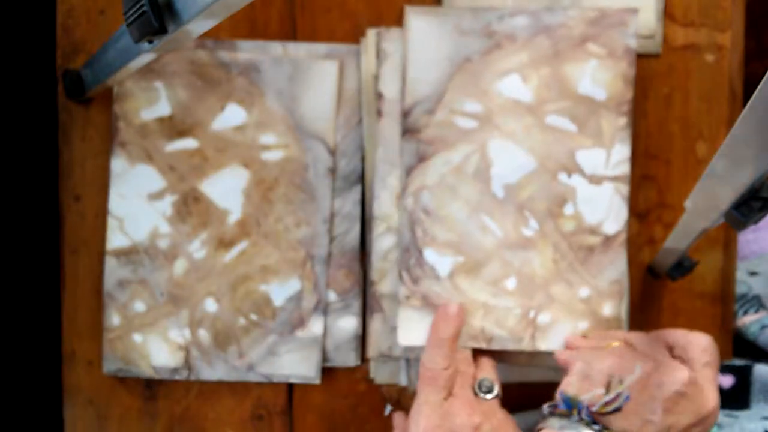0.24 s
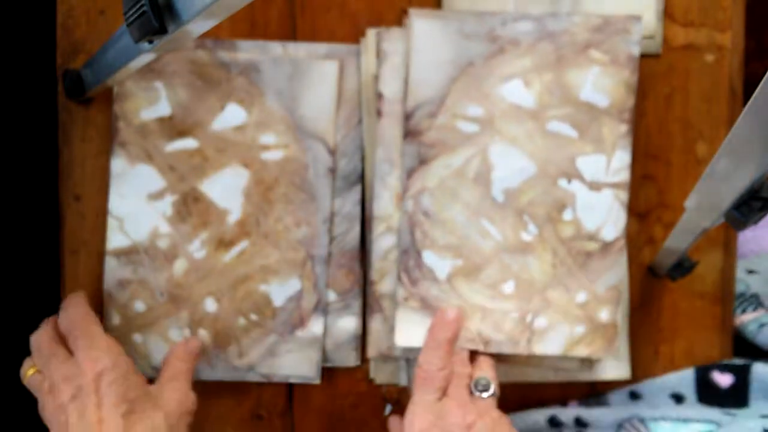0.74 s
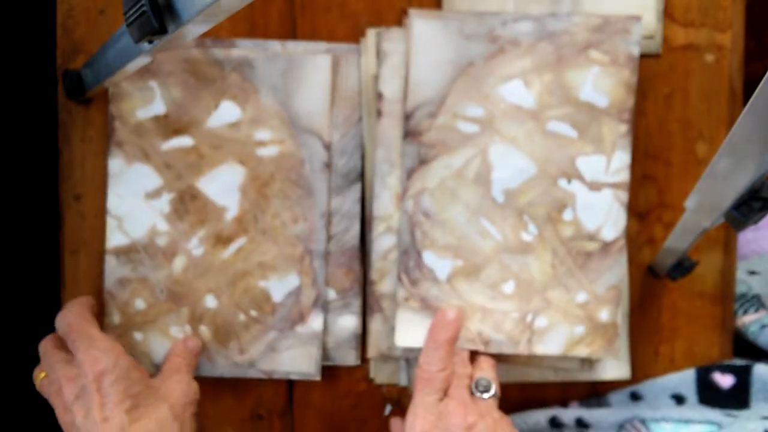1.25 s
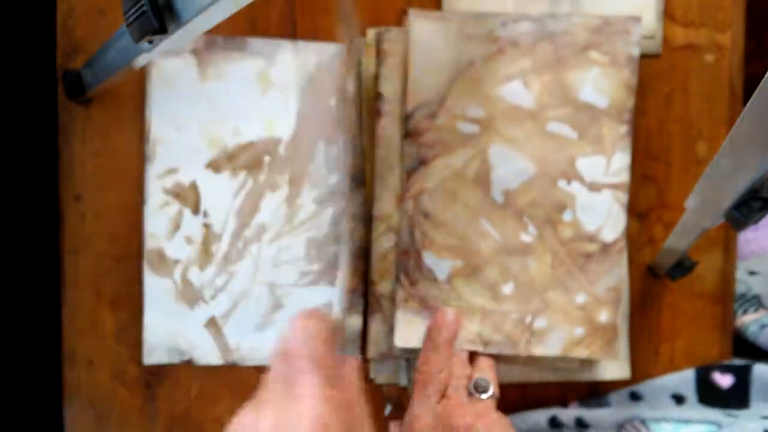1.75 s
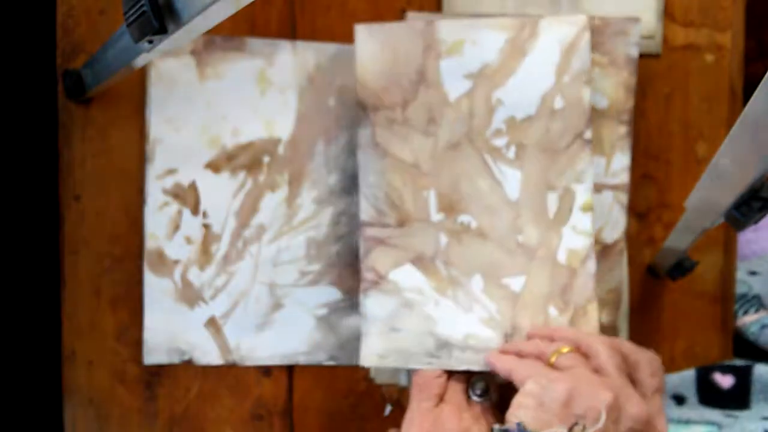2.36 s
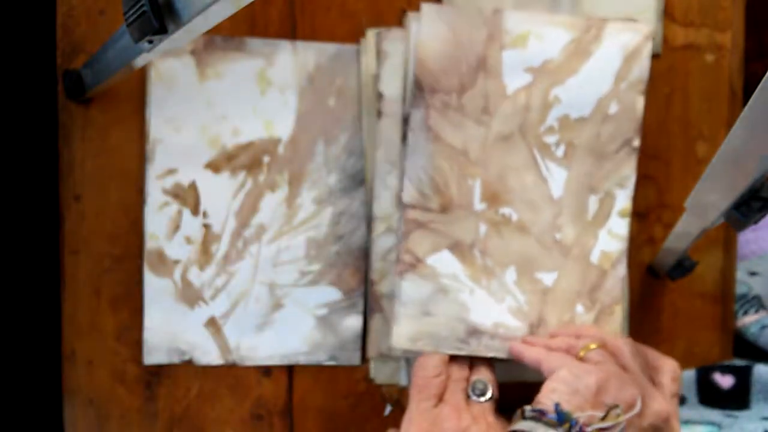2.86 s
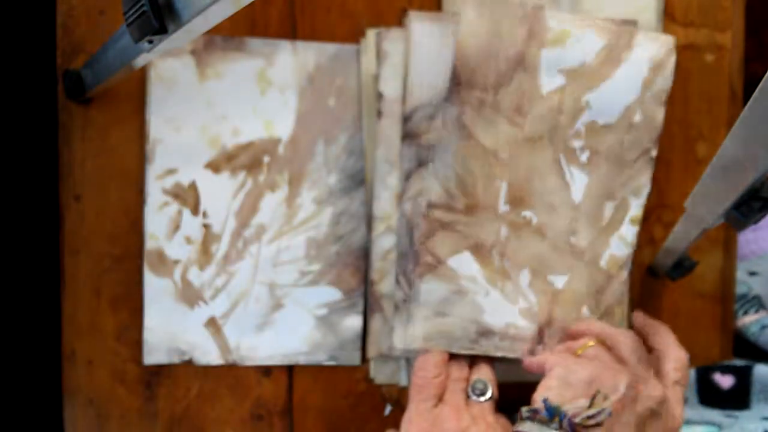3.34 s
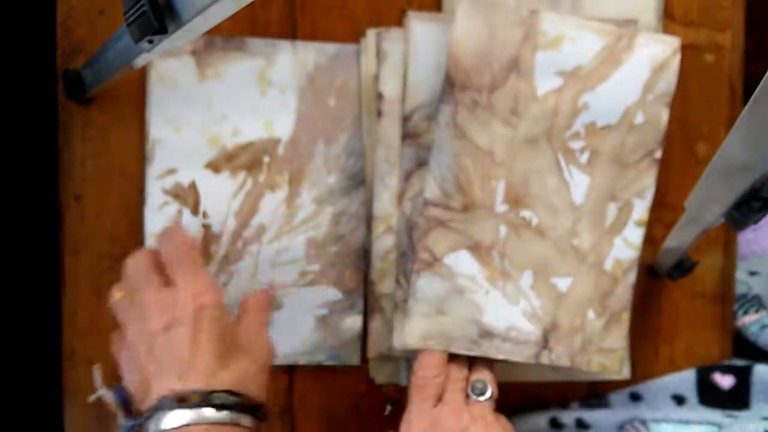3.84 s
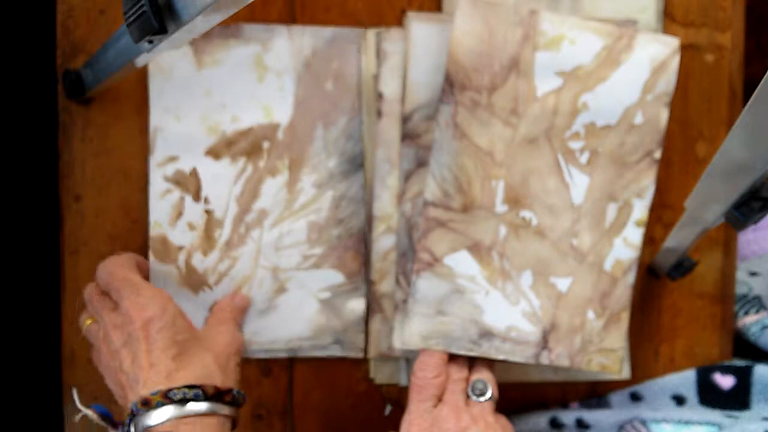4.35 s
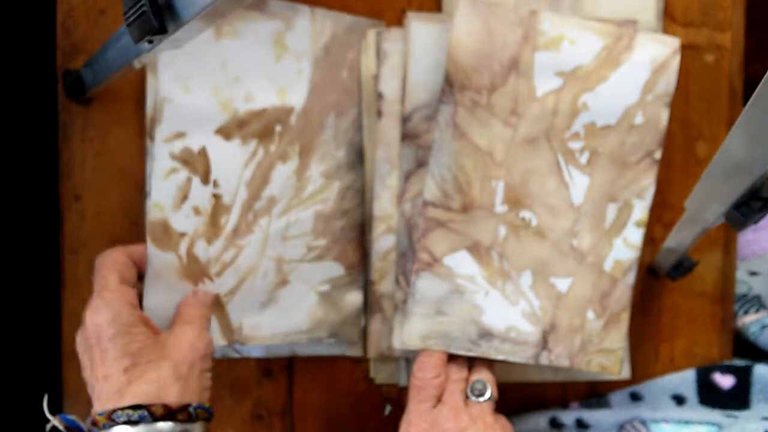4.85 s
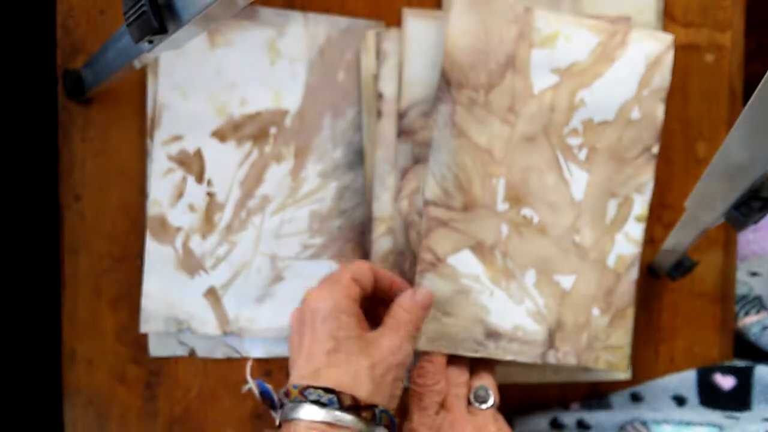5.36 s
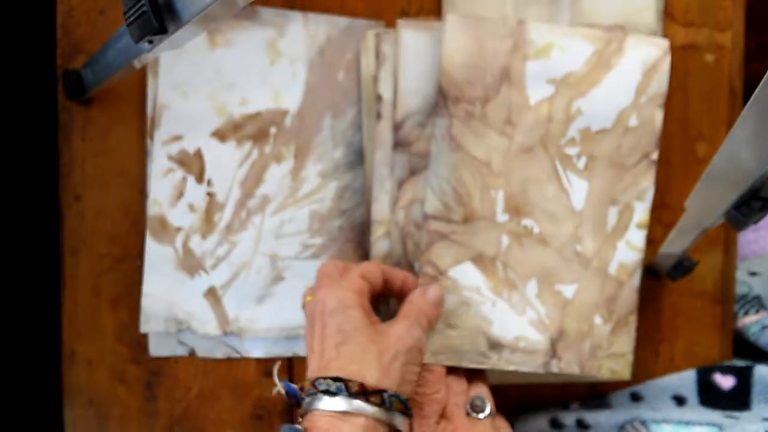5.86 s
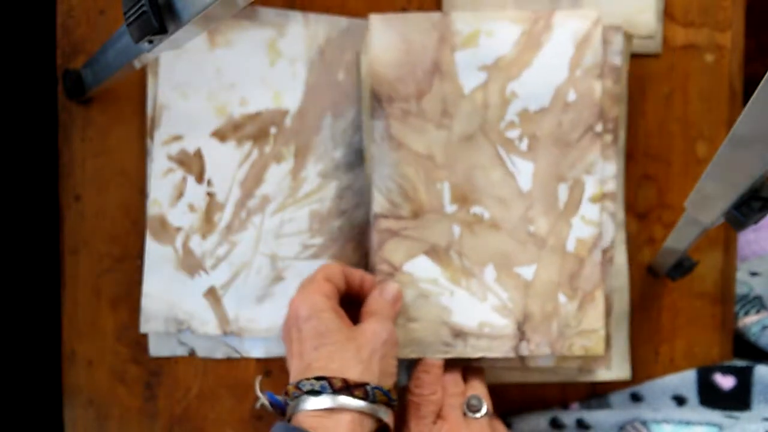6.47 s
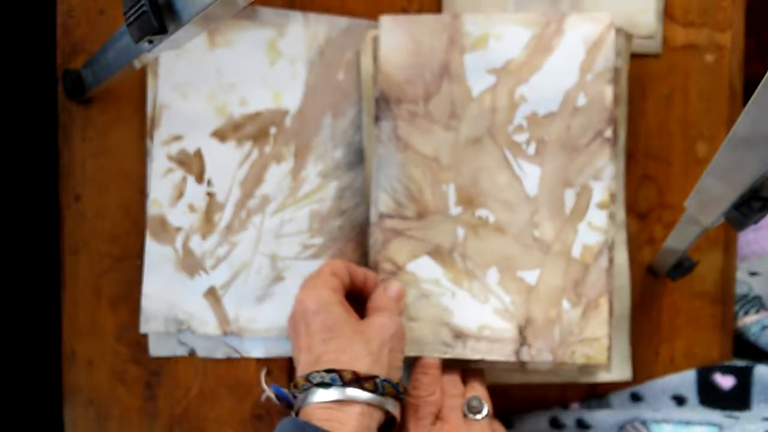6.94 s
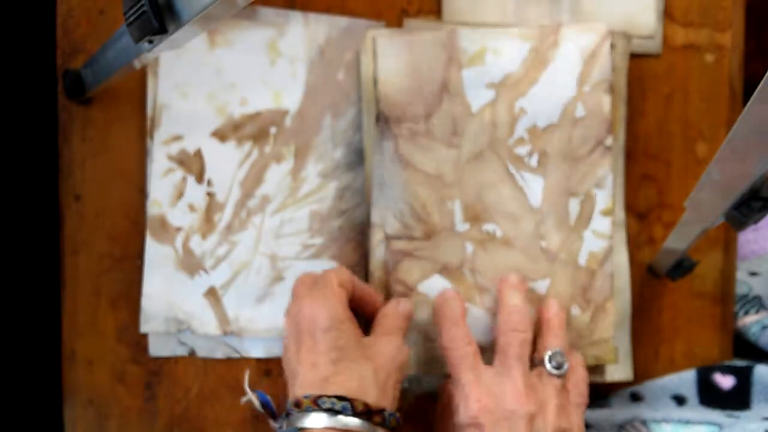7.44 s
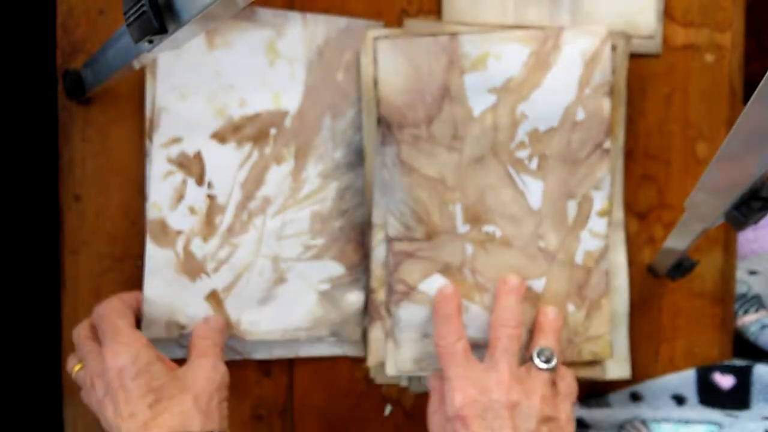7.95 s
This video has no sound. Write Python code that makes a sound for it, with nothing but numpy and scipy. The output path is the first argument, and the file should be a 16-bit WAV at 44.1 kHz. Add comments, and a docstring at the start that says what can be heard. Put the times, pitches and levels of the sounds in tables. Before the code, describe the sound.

Stiff, dry paper is handled close to a phone on a stand in a small, quiet, slightly reverberant room. A crisp flick and knock at 0.1 s lead to a quick swish at 0.3, then near quiet. From 1 to 2 s, low table sway underlies rustling, bright edge flicks and a short rasp. Separate slides swell around 2.2, 2.7 and, strongest here, 3.3 s. From 4 to 4.6 s, fingers rub and knock the stack among swishes and squeaky rasps, with a soft low bump. Two tight clicks snap at 5.05 s, then handling thins to faint rustle. A brisk swish peaks at 6.2 s, followed by dull bumps at 6.5 and 6.9. At 7.16 s a sheet buckles with a very loud, sharp snap and a swish; another flick and knock follow at 7.5, then soft rubbing and taps near 7.9 s and a last rustle.

```python
"""Handling stiff paper sheets

Stiff dyed sheets are slid, lifted and laid on two stacks on a wooden table, under a phone on a stand.
Sliding is stick-slip friction: a noisy stream of tiny slips coloured by the sheet and swelling with each stroke.
Edges flick as short noise bursts; taps, bumps and a buckling sheet excite decaying modes; fibres squeak faintly.
Handling shakes table and stand, heard as low sway and rumble in a small, quiet, reverberant room."""
import sys
import numpy as np
from scipy import signal
from scipy.fft import rfft, irfft, next_fast_len
from scipy.io import wavfile

SR = 44100
rng = np.random.default_rng(int(sys.argv[2]) if len(sys.argv) > 2 else 0)


def store_wav(level_fs):
    """Save 16-bit WAV to argv[1]."""
    pcm = np.round(np.clip(np.atleast_2d(level_fs), -1, 1) * 32767)
    wavfile.write(sys.argv[1], SR, pcm.T.astype(np.int16))


N = 361619  # samples, about 8.2 s
TIME = np.arange(N) / SR
FREQ = np.maximum(np.arange(N // 2 + 1) * SR / N, 1)
BRISK_DB = -53  # hiss level of a brisk stroke, the reference for rumble and crackle

# spectrum that the paper gives to friction: (frequency [Hz], relative level [dB])
PAPER_COLOUR = [(150, -12), (350, -2), (600, -2), (900, 2), (1300, 0.5), (1900, 0), (2500, 2), (3400, 0),
                (5000, 4.5), (6800, -1.5), (8800, 2.5), (11000, -3.5), (13500, -9.5), (16000, -11.5)]


def undb(db):
    """Amplitude ratio is ten to the power of decibels over twenty."""
    return 10 ** (np.asarray(db) / 20)


def unit(x):
    """Normalise the root-mean-square amplitude to 1."""
    return x / np.sqrt(np.mean(x ** 2))


def at(points, hz):
    """Interpolate (frequency [Hz], value) points linearly on a logarithmic frequency axis."""
    f, value = np.transpose(points)
    return np.interp(np.log(hz), np.log(f), value)


def colour(x, points):
    """Linear filtering: multiply the spectrum by gains given as (frequency [Hz], gain [dB])."""
    return irfft(rfft(x) * undb(at(points, FREQ)), N)


def bands(x, count=24):
    """Filter bank: triangular gains on a log-frequency axis, summing to one between the outer centres."""
    centres = np.geomspace(130, 16000, count)
    size = next_fast_len(len(x))
    spectrum = rfft(x, size)
    hz_axis = np.maximum(np.arange(len(spectrum)) * SR / size, 1)
    place = np.log(hz_axis / centres[0]) / np.log(centres[1] / centres[0])
    for k, hz in enumerate(centres):
        gain = np.maximum(1 - abs(place - k), 0)
        yield hz, irfft(spectrum * gain, size)[:len(x)]


def walk(rate):
    """Slow random modulation: line segments join `rate` random values a second, scaled to rms 1."""
    values = rng.standard_normal(N // 20)
    return unit(np.interp(TIME * rate, np.arange(N // 20), values))


def add(track, s, sound):
    """Superposition: mix a sound into the track from s seconds on."""
    start = max(int(s * SR), 0)
    track[start:start + len(sound)] += sound[:N - start]


def ring(modes, scatter, scatter_db, tilt_db=0):
    """Modal synthesis: a blow sums decaying sines; landing on another spot shifts pitch and strength."""
    t = TIME[:SR // 4]
    hz, db, t60 = np.transpose(modes)[:, :, None]
    detune, strength = rng.standard_normal((2, len(modes), 1))
    sign = (-1) ** np.arange(len(modes))[:, None]
    gain = undb(db + scatter_db * strength + tilt_db * np.log2(hz / hz[0])) * sign
    decay = np.exp(-np.log(1000) * t / t60)
    waves = np.sin(2 * np.pi * hz * (1 + scatter * detune) * t) * decay
    return np.sum(gain * waves, axis=0) / np.sqrt(np.sum(gain ** 2))


def slips(rate_hz, spread_db, smooth):
    """Stick-slip as random impulses with exponentially spread levels, over the grain's even hiss."""
    sizes = undb(spread_db * np.minimum(rng.exponential(size=N), 5))
    clicks = (rng.random(N) < rate_hz / SR) * sizes * rng.choice([-1, 1], N)
    return unit(unit(clicks) + smooth * rng.standard_normal(N))


def swell(peak_s, rise_s, fall_s, db):
    """Envelope of a hand movement: gains its last 20 dB in rise_s and loses its first 20 dB in fall_s."""
    away = np.maximum((peak_s - TIME) / abs(rise_s), (TIME - peak_s) / abs(fall_s))
    return undb(db - 20 * np.minimum(away, 4) ** 1.5)


def strokes():
    """Incoherent powers add, so where strokes overlap the stronger sets hiss, edge and flexing [dB]."""
    # one sheet is pushed over another: (fastest moment [s], speeding up [s], slowing down [s],
    # hiss control level [dB], edge brightness over the hiss [dB], flexing over the hiss [dB]);
    # sliding() adds its own offsets to these levels
    pushes = [(0.056, 0.39, 0.28, -60.5, 3.5, 1), (0.267, 0.11, 0.035, -47.5, -2, -1),
              (0.335, 0.076, 0.072, -62.5, -0.5, -4), (0.514, 0.17, 0.12, -76.5, 3, 6),
              (1.03, 0.32, 0.47, -72.5, -4, 4), (1.088, 0.049, 0.056, -50, -8, -2.5),
              (1.289, 0.15, 0.018, -57.5, -6.5, 0), (1.363, 0.072, 0.089, -54, -4.5, -0.5),
              (1.471, 0.081, 0.17, -55.0, -0.5, 1.5), (1.599, 0.036, 0.025, -53.5, 6, -0.5),
              (1.649, 0.058, 0.28, -54.5, -0.5, 2), (1.901, 0.31, 0.13, -55.5, -6.5, 1.5),
              (2.051, 0.077, 0.086, -60, -1, -1), (2.185, 0.18, 0.14, -50, -5, 1),
              (2.415, 0.03, 0.13, -62, -2, 1), (2.726, 0.09, 0.074, -47.5, -3.5, -3.0),
              (2.821, 0.071, 0.073, -61, -7, 2), (3.078, 0.15, 0.047, -66.5, -3, -10),
              (3.203, 0.13, 0.065, -65.5, -4.0, -5.5), (3.296, 0.048, 0.086, -45.5, -3.0, -1.5),
              (3.433, 0.26, 0.059, -58.5, -3.5, -0.5), (3.599, 0.079, 0.039, -75.5, -0.5, 1),
              (3.976, 0.045, 0.17, -62.5, 1, -3), (4.051, 0.046, 0.23, -60.5, -6.0, -2),
              (4.236, 0.064, 0.12, -48.5, -3, -9), (4.325, 0.085, 0.039, -51, -9, -12),
              (4.39, 0.062, 0.086, -55.5, -6, 1), (4.571, 0.11, 0.093, -60.5, -5.5, 3),
              (4.75, 0.41, 0.15, -61.5, 4, -3), (5.12, 0.13, 0.14, -68, -5, -0.5),
              (5.479, 0.11, 0.057, -72.0, 7.5, 2), (5.632, 0.153, 0.16, -69.5, 1.5, -1.5),
              (5.849, 0.02, 0.056, -75, 12.0, -7), (6.12, 0.22, 0.12, -57, 3, 2.5),
              (6.232, 0.13, 0.029, -44.5, -5, -4.5), (6.285, 0.081, 0.09, -62.5, -3, 2),
              (6.41, 0.1, 0.16, -57, -2, -5), (6.949, 0.26, 0.1, -70.5, -2.0, 3),
              (7.124, 0.069, 0.18, -46.5, -3.5, -4.5), (7.343, 0.042, 0.084, -58.5, 0.5, -1.5),
              (7.501, 0.12, 0.057, -49, -3.5, -10), (7.595, 0.087, 0.076, -61, -6, 1.5),
              (7.757, 0.26, 0.4, -63, -7.5, 0.0), (7.965, 0.16, 0.217, -68, 2.5, 4),
              (8.101, 0.022, 0.085, -58, -3.5, -1.5), (8.195, 0.079, 0.06, -55.5, -9, -10.5)]
    power, edge, flex = np.zeros((3, N))
    for peak_s, rise_s, fall_s, db, edge_db, flex_db in pushes:
        push = swell(peak_s, rise_s, fall_s, db) ** 2
        power = power + push
        edge = edge + push * edge_db
        flex = flex + push * flex_db
    return 10 * np.log10(power), edge / power, flex / power


def sliding(hiss, edge, flex, gain_db=4, edge_db=2, flex_db=2.0,
            patchy_db=3.5, judder_db=1.65, catch_db=0.82):
    """Friction excites the sheet, whose resonances shift as it bends; the pull is never quite even."""
    friction = slips(rate_hz=9000, spread_db=2.6, smooth=.7)
    friction = friction * undb(judder_db * walk(90) + catch_db * walk(28))
    out = np.zeros(N)
    for hz, band in bands(colour(friction, PAPER_COLOUR), count=32):
        # the edge brightens the treble, flexing lifts the lower bands
        edge_share = at([(5500, 0.13), (8500, 0.98)], hz)
        flex_share = at([(1800, 0.85), (3200, 0)], hz)
        db = hiss + edge_share * (edge + edge_db) + flex_share * (flex + flex_db)
        out += band * undb(db + patchy_db * (1 - edge_share / 2) * walk(16))
    return out * undb(gain_db)


def squeaks():
    """Nearly periodic stick-slip of fibres: noise-modulated quadrature carriers make a gliding narrow band."""
    # a rubbed sheet rasps or squeaks:
    # (start [s], length [s], start pitch [Hz], end pitch [Hz], bandwidth [Hz], level [dB])
    rasps = [(0, 0.1, 1800, 1805, 400, -57.5), (1.486, 0.069, 1900, 1770, 400, -61),
             (1.861, 0.069, 1505, 1147, 550, -54.5), (1.991, 0.12, 3330, 3390, 900, -60.5),
             (2.099, .156, 618, 720, 280, -65), (4.168, 0.22, 1782, 2008, 700, -55.5),
             (4.241, .13, 5630, 6300, 1700, -56), (4.579, 0.22, 2440, 2610, 240, -70),
             (5.931, 0.31, 877, 940, 200, -71), (6.76, .075, 2380, 2560, 240, -69),
             (6.86, .134, 2800, 3300, 700, -72), (7.435, 0.034, 2980, 3150, 400, -53),
             (7.574, .046, 4500, 4650, 450, -61.5), (7.709, 0.092, 5100, 4820, 600, -66.5)]
    out = np.zeros(N)
    for start, length, start_hz, end_hz, width_hz, db in rasps:
        size = max(int(length * SR), 64)
        phase = 2 * np.pi * np.cumsum(np.linspace(start_hz, end_hz, size)) / SR
        lowpass = signal.butter(2, width_hz / 2, fs=SR, output="sos")
        ragged = signal.sosfilt(lowpass, rng.standard_normal((2, SR)))[:, :size]
        tone = unit(ragged[0] * np.cos(phase) + ragged[1] * np.sin(phase))
        add(out, start, tone * signal.windows.tukey(size, .5) * undb(db))
    return out


def crackle(hiss, gain_db=-11, growth=0.58, tick_s=.0012):
    """Creases release as random impulses with exponential decay, louder under a brisk stroke."""
    ticks = slips(rate_hz=60, spread_db=2.2, smooth=0)
    fading = signal.lfilter([1], [1, -np.exp(-1 / (tick_s * SR))], abs(ticks))
    creases = unit(colour(fading * rng.standard_normal(N), PAPER_COLOUR))
    return creases * undb(BRISK_DB + growth * (hiss - BRISK_DB) + gain_db)


def stand(hiss, sway_db=0, creak_db=-9, uneven_db=3.0):
    """Forced vibration: presses sway the stand near one pitch and a higher band; rumble grows with handling."""
    # the hand presses on the table: (heaviest moment [s], level [dB])
    presses = [(.88, -47.5), (1.0, -49), (1.125, -41.5), (1.26, -44.5), (1.355, -44.5), (1.5, -50.5),
               (1.61, -48)]
    # floor of the rumble, before its uneven wander: (time [s], level [dB])
    rest_level = [(0, -58.5), (.6, -65.5), (1.3, -58), (2.0, -61), (2.45, -81), (3.1, -64), (3.8, -68),
                  (4.6, -62), (5.35, -76), (5.6, -60.5), (8.2, -60.5)]
    # spectrum of the rumble: (frequency [Hz], relative level [dB])
    rumble_colour = [(20, -54), (32, -32), (43, -1), (58, -4), (72, -8.5), (90, -4), (120, -11.5),
                     (170, -29.5), (300, -45.5)]
    stand_hz, press_rise_s, press_fall_s = 55, 0.055, .13
    rumble_db, rumble_growth = -62, 0.29  # level at a brisk hiss, dB of rumble per dB of hiss

    phase = 2 * np.pi * np.cumsum(stand_hz * (1 + .09 * walk(18))) / SR
    creak_colour = [(40, -42), (62, 0), (92, 0), (120, -12), (200, -22.0), (400, -47)]
    creak = unit(colour(rng.standard_normal(N), creak_colour))
    weight = sum(swell(s, press_rise_s, press_fall_s, db + sway_db) for s, db in presses)
    sway = (unit(np.sin(phase)) + undb(creak_db) * creak) * weight

    rumble = unit(colour(rng.standard_normal(N), rumble_colour))
    resting = undb(np.interp(TIME, *np.transpose(rest_level)))
    handling = undb(rumble_db + rumble_growth * (hiss - BRISK_DB))
    shaking = np.hypot(resting, handling)
    return sway + rumble * shaking * undb(uneven_db * walk(9))


def flicks(gain_db=0.0, pivot_hz=3500, rise_s=0.00041):
    """Transient friction: paper-coloured noise starts quickly and decays exponentially."""
    # a sheet edge flicks free or slaps down:
    # (time [s], level [dB], decay constant of the scrape [s], tilt [dB per octave])
    edge_flicks = [(0.1, -33, 0.0023, -3.5), (0.121, -40.5, 0.0037, -6), (0.281, -34.5, 0.0037, -2),
                   (1.047, -50, 0.0079, 0.5), (1.07, -38, 0.0065, 1), (1.09, -38.5, 0.0039, 0.5),
                   (1.458, -41.5, 0.0016, -5), (1.651, -39.5, .003, 6), (1.936, -44, .0028, 10),
                   (2.398, -55.5, 0.0039, -5.5), (2.891, -55, .002, 4), (3.343, -40.5, 0.0022, -5.5),
                   (3.376, -42, .0036, 5.5), (3.414, -41.5, 0.0016, -4.5), (3.925, -54, 0.0043, -1.5),
                   (3.944, -48.5, 0.0033, 1.5), (4.054, -46, .005, 2), (4.178, -49.5, 0.0056, -1),
                   (4.455, -47.5, 0.0044, -1.5), (4.498, -49.5, 0.0055, 0), (4.571, -41, 0.0053, .5),
                   (5.0473, -33.5, 0.0017, -3), (5.054, -31.5, 0.0008, -0.5), (5.064, -49.5, 0.0074, -3),
                   (5.537, -53.5, 0.0019, -3.5), (5.655, -51, .0032, 10), (5.702, -57, 0.0018, -7),
                   (7.17, -35, .003, -7.5), (7.174, -35, 0.0042, -1.5), (7.184, -35, 0.0033, -5),
                   (7.474, -40, 0.0023, -1), (7.489, -33, 0.0032, -2.5), (7.4937, -29.5, 0.0032, -3),
                   (7.508, -40.5, 0.0072, -6), (8.042, -52, .0023, 2), (8.089, -48, .005, -2)]
    out, t = np.zeros(N), TIME[:2048]
    hz = np.maximum(np.arange(len(t) // 2 + 1) * SR / len(t), 1)
    for s, db, length, tilt_db in edge_flicks:
        shape = np.exp(-t / length) * (1 - np.exp(-t / rise_s))
        tilt = tilt_db * np.log2(np.maximum(hz, 700) / pivot_hz)
        gain = undb(at(PAPER_COLOUR, hz) + tilt)
        scrape = irfft(rfft(rng.standard_normal(len(t))) * gain) * shape
        add(out, s, unit(scrape) * np.sqrt(np.mean(shape ** 2)) * undb(db + gain_db))
    return out


def taps(gain_db=-1, scuff_db=-9, scuff_s=0.0067):
    """Impact excites modes of stack and table, with a dull scuff of skin; a harder touch is brighter."""
    # fingers and sheets knock on the stack: (time [s], knock before gain_db [dB],
    # thud of the table before gain_db [dB], hardness as tilt of the knock [dB per octave])
    knocks = [(0.111, -35.5, -64, 4), (0.289, -43, -60, -18), (1.452, -41, -38.5, 5),
              (1.9325, -56, -44.5, 0), (2.57, -49.5, -62, -2), (3.4408, -43, -54, 5),
              (3.984, -43, -37.5, -12), (4.055, -44, -44, 22), (4.362, -47, -43.5, -10),
              (4.4588, -30.5, -35.5, -8.5), (4.4994, -38.5, -33.5, 4), (4.586, -41.5, -36, 14),
              (5.051, -47.5, -37.5, 13), (5.081, -60, -43, 0), (5.7023, -52, -57, -9),
              (7.163, -34, -41, -2), (7.497, -32.5, -60, -10), (7.858, -51, -38.5, 15),
              (7.889, -49.5, -52, -9), (7.957, -46, -41, 16), (7.9676, -32.5, -39.5, 0.5)]
    # modes of the stack's knock: (frequency [Hz], relative level [dB], 60 dB decay time [s])
    stack_modes = [(487, -5.5, 0.026), (646, -20, 0.029), (775, -2.5, 0.032), (881, 3, 0.036),
                   (1325, 4.5, 0.036), (1430, 4, 0.018), (1619, 0.5, 0.047), (1780, -12, 0.017),
                   (2060, -11, 0.017)]
    # modes of the table's thud: (frequency [Hz], relative level [dB], 60 dB decay time [s])
    table_modes = [(78, -10, 0.2), (132, -9, 0.14), (186, -1.5, 0.099), (208.4, 1.5, 0.083),
                   (290, -3, 0.057), (416, -5.5, 0.067)]
    out, t = np.zeros(N), TIME[:SR // 4]
    skin_colour = [(80, -17), (180, 4), (450, 1.5), (900, -1), (2000, -9.5), (4000, -22), (9000, -31)]
    skin = unit(colour(rng.standard_normal(N), skin_colour))
    for s, knock_db, thud_db, hardness in knocks:
        knock = ring(stack_modes, scatter=.06, scatter_db=2, tilt_db=hardness)
        thud = ring(table_modes, scatter=.06, scatter_db=2)
        scuff = np.roll(skin, -int(s * SR))[:len(t)] * np.exp(-t / scuff_s)
        touch = undb(knock_db) * (knock + undb(scuff_db) * scuff)
        add(out, s, touch + undb(thud_db) * thud)
    return out * undb(gain_db)


def hand(gain_db=-1):
    """Skin friction drags over the stack, which acts as a low-pass filter."""
    # the hand rubs over the stack:
    # (fastest moment [s], speeding up [s], slowing down [s], level before gain_db [dB])
    rubs = [(1.65, 1.0, 1.0, -60.5), (4.0, 0.058, 0.21, -57), (4.5, .5, 0.31, -55.5),
            (7.87, 0.88, .4, -58.5)]
    drag_colour = [(60, -18), (130, 4), (220, 5), (420, -1.5), (750, -16.5), (1500, -50), (5000, -60)]
    drag = colour(slips(rate_hz=730, spread_db=-0.5, smooth=0.2), drag_colour)
    return unit(drag) * sum(swell(*rub) for rub in rubs) * undb(gain_db)


def bumps(rise_s=0.0047, gain_db=0):
    """A slow push by the soft heel of the hand excites only the table's lowest modes."""
    # the hand's weight bumps the table: (time [s], level [dB])
    pushes = [(2.691, -44), (3.195, -43), (4.045, -35.5), (4.782, -39.5), (5.092, -42), (6.445, -39.5),
              (6.528, -39), (6.921, -39.5), (7.516, -41)]
    # the table top's slow flexing: (frequency [Hz], relative level [dB], 60 dB decay time [s])
    flexing_modes = [(57.5, 6, 0.15), (87, -12.5, 0.42), (118, -5.5, 0.07)]
    out = np.zeros(N)
    for s, db in pushes:
        flexing = ring(flexing_modes, scatter=0.039, scatter_db=9.0)
        onset = 1 - np.exp(-TIME[:len(flexing)] / rise_s)
        add(out, s, undb(db + gain_db) * flexing * onset)
    return out


def snap(crackle_db=-7, crackle_s=0.0011, rise_s=0.00027):
    """Buckling releases strain: the sheet's modes ring briefly, with a crackle of fibres giving way."""
    # a stiff sheet buckles and snaps flat: (time [s], level [dB])
    buckling = (7.1603, -11.5)
    # modes of the buckling sheet: (frequency [Hz], relative level [dB], 60 dB decay time [s])
    sheet_modes = [(900, -16.5, 0.03), (1050, -20, 0.018), (2480, -2.5, 0.012), (3060, -1, .01),
                   (3410, -0.5, 0.012), (4560, 0, 0.0076), (5400, -5, 0.0063), (6400, 1, 0.0056),
                   (7060, -16, 0.0027), (9270, 0, 0.0045), (11500, -17, 0.0018), (15000, -13, .002)]
    out = np.zeros(N)
    snap_s, snap_db = buckling
    sheet = ring(sheet_modes, scatter=0.0048, scatter_db=1.5)
    t = TIME[:len(sheet)]
    fibres = unit(colour(rng.standard_normal(N), PAPER_COLOUR))[:len(t)] * np.exp(-t / crackle_s)
    onset = 1 - np.exp(-t / rise_s)
    add(out, snap_s, undb(snap_db) * (sheet + undb(crackle_db) * fibres) * onset)
    return out


def room(x, wet_db, near_db, near_s=0.0083, count=4):
    """Reverberation: convolve with near scatter and a wall tail; responses trade as the source moves."""
    # the room's reverberation: (frequency [Hz], 60 dB decay time [s])
    room_t60 = [(150, 0.31), (600, 0.41), (2000, 0.28), (6000, 0.22), (14000, 0.067)]
    t = TIME[:SR // 2]
    nearness = np.array([walk(5) for _ in range(count)])
    out = x.copy()
    for share in nearness / np.sqrt(np.sum(nearness ** 2, axis=0)):
        tail = np.zeros(len(t))
        for hz, band in bands(rng.standard_normal(len(t)), count=8):
            tail += band * np.exp(-np.log(1000) * t / at(room_t60, hz))
        near = signal.lfilter([1], [1, -.4], rng.standard_normal(len(t))) * np.exp(-t / near_s)
        # near surfaces answer after 2 ms, the walls after 8 ms
        response = undb(wet_db) * unit(tail * (t > .008)) + undb(near_db) * unit(near * (t > .002))
        out += signal.fftconvolve(x * share, response / np.sqrt(len(t)))[:N]
    return out


def still_room(level_db=-71.5):
    """Background noise: a stationary random signal with the spectrum of the still room."""
    # spectrum of the still room: (frequency [Hz], relative level [dB])
    quiet_colour = [(20, -2), (100, 6), (200, 10.5), (400, 0), (800, -1.5), (1500, -9), (3000, -10),
                    (5000, -9), (7000, -13.5), (9500, -12.5), (16000, -11)]
    return unit(colour(rng.standard_normal(N), quiet_colour)) * undb(level_db)


def scene():
    """Superposition of paper, hands and table in the room, over its faint hiss."""
    hiss, edge, flex = strokes()
    # a whole sheet radiates from many points at once, which blurs its reflections
    swish = room(sliding(hiss, edge, flex) + squeaks(), wet_db=-23.5, near_db=-13)
    edges = room(flicks() + snap() + crackle(hiss), wet_db=-13.0, near_db=-6.5)
    table = room(taps() + hand(), wet_db=-15.5, near_db=-17)
    return (swish + edges + table + bumps() + stand(hiss) + still_room())[None]


def record(dry):
    """Band limiting: the phone cuts the top with a steep elliptic low-pass at 15850 Hz."""
    return signal.sosfilt(signal.ellip(10, .2, 70, 15850, fs=SR, output="sos"), dry)


dry = scene()
out = record(dry)
store_wav(out)
```